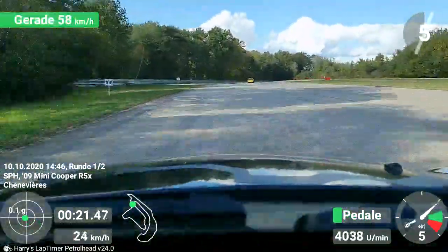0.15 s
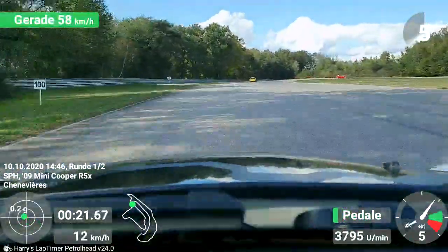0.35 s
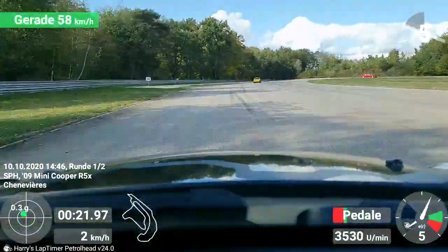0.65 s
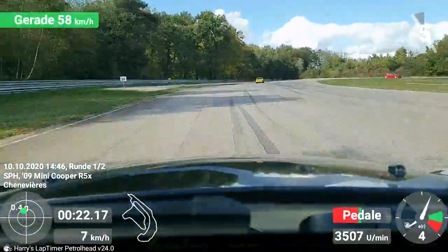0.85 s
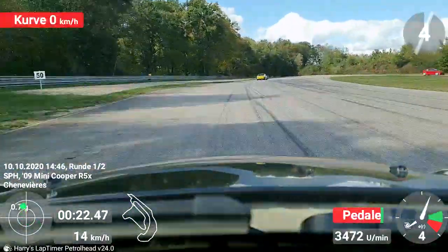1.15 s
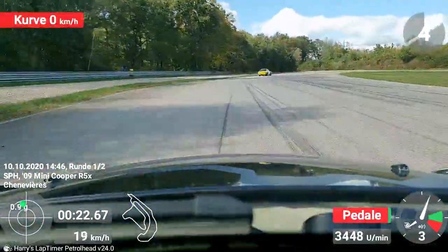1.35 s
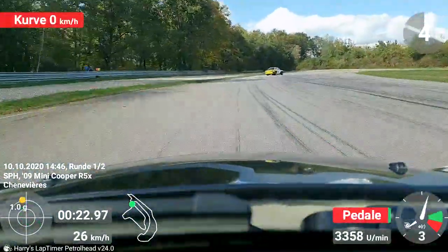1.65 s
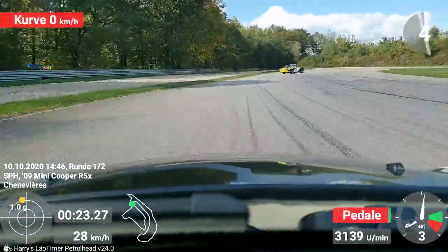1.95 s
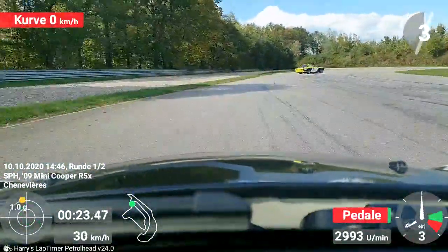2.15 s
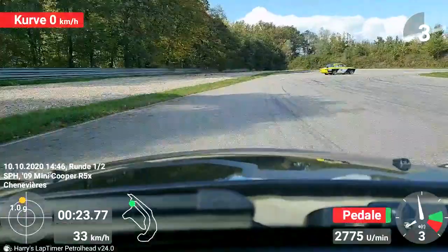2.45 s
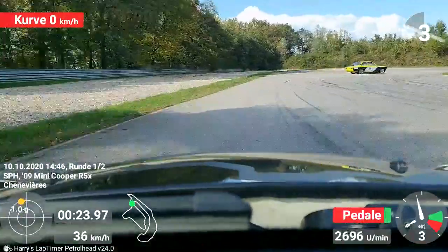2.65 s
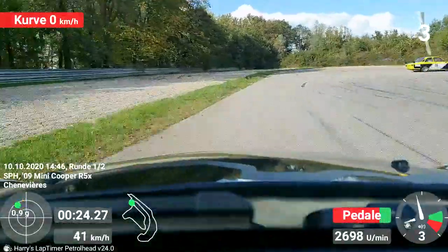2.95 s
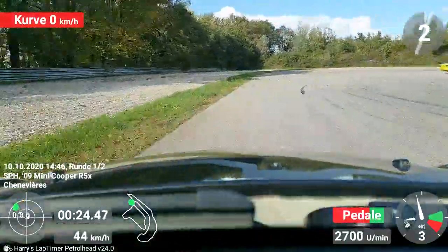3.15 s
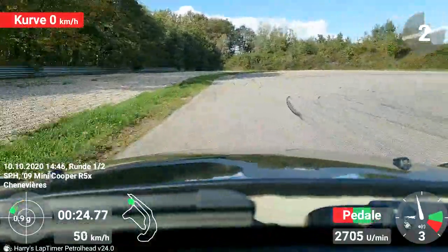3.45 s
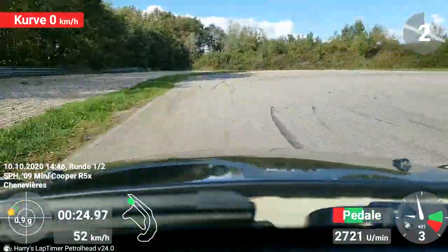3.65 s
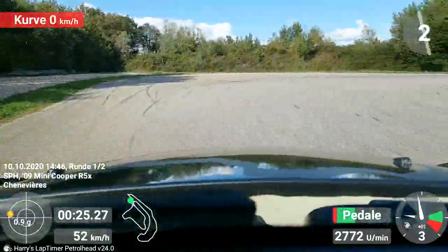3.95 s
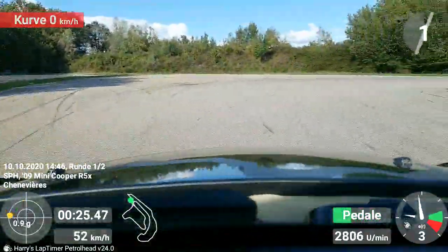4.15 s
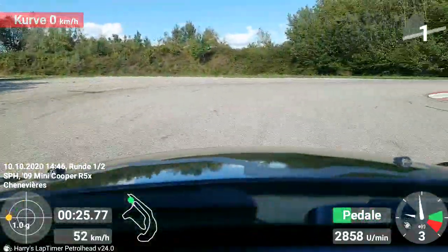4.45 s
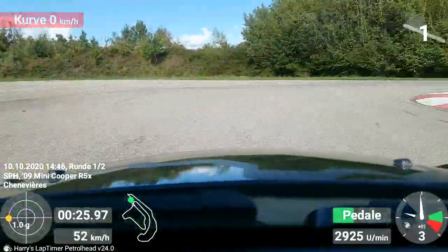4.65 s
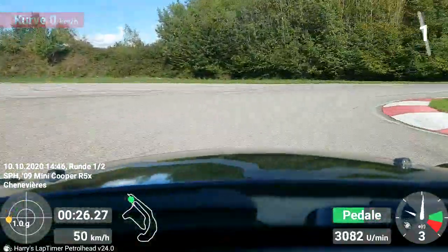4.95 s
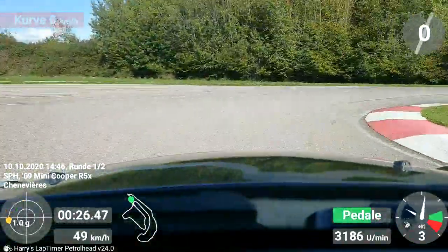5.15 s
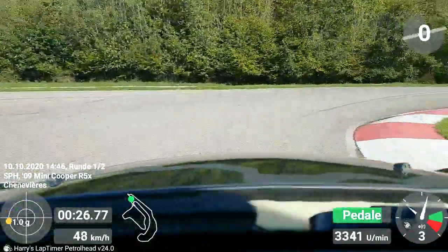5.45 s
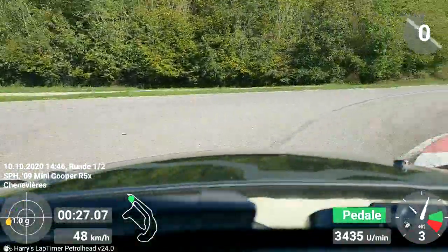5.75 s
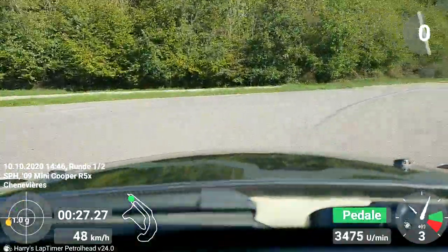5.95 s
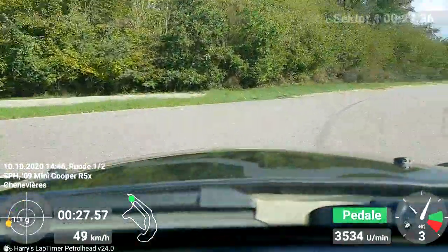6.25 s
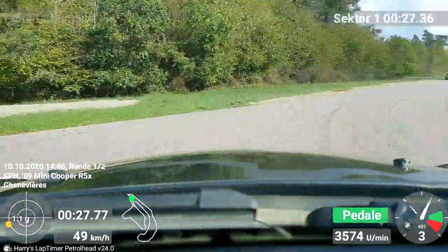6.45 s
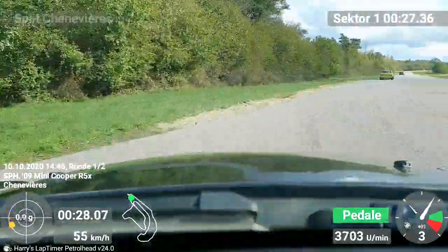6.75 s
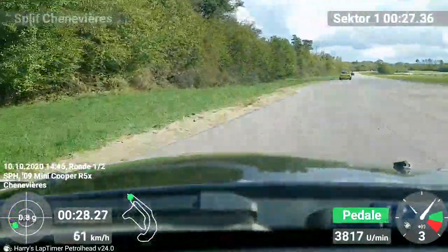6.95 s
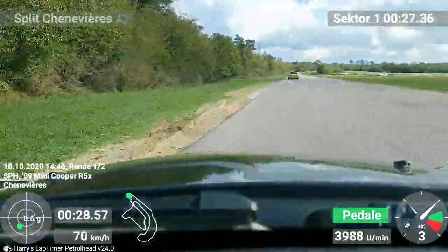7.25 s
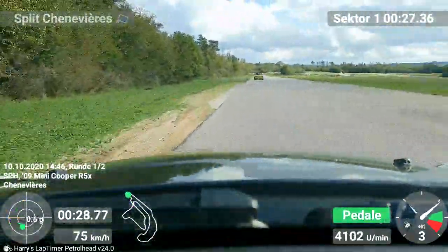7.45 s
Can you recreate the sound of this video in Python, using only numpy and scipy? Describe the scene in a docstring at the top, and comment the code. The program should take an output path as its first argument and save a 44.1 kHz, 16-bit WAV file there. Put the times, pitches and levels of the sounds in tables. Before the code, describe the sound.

Heard from behind the windscreen, a four-cylinder turbo car runs flat out over rumbling tyres and a light rush of air. It soon lifts off for a bend, with a few sharp knocks of grit, a ragged exhaust burble and faint tyre scrub. A deep engine braking drone follows as the revs sink. After a short burst of throttle the car accelerates out, the exhaust rasp returning in the cabin.

```python
"""Inside a turbocharged four-cylinder car on a race track, from a stereo pair behind the windscreen.
First it runs flat out: the exhaust booms in the cabin and rasps under boost. At 0.9 s the throttle shuts
for a bend: the pipe burbles, grit flies into the wheel arches, braked tyres scrub, and from 2 s engine
braking drones. After a stab at 4.5 s the car pulls out, and the boost returns near 7 s.
All the while the tyres rumble below and air hisses round the body."""
import sys
import numpy as np
from scipy import signal
from scipy.fft import rfft, irfft, next_fast_len
from scipy.io import wavfile
from scipy.ndimage import uniform_filter1d, minimum_filter1d, map_coordinates

SR = 44100
rng = np.random.default_rng(int(sys.argv[2]) if len(sys.argv) > 2 else 0)


def put_to_file(sound):
    """Save the sound as 16-bit audio at rate SR, in the file named by the first command-line argument."""
    columns = np.atleast_2d(sound).T  # one column per channel
    safe = np.clip(columns, -1, 1)
    whole_steps = np.round(safe * 32767)
    wavfile.write(sys.argv[1], SR, whole_steps.astype(np.int16))


N = 335160
T = np.arange(N) / SR


# engine speed: (time [s], firing rate [Hz])
FIRING_RATE = [(0.0, 157.9), (0.66, 161.6), (0.82, 156.9), (1.0, 156.3), (1.5, 134.9), (1.92, 122.6),
               (2.52, 98.4), (2.92, 125.8), (3.27, 96.3), (3.43, 88.0), (3.58, 98.1), (3.73, 85.5),
               (3.86, 92.6), (4.12, 86.1), (4.2, 92.5), (4.7, 89.3), (5.1, 87.9), (5.73, 91.9),
               (5.83, 100.1), (6.04, 91.0), (6.15, 98.2), (6.25, 95.4), (6.35, 99.2), (6.63, 98.9),
               (6.85, 111.3), (6.92, 108.5), (7.02, 117.6), (7.36, 115.9), (7.6, 124.8)]
# throttle flat out, shut, stabbed, then fed in again: (time [s], load [1 = full])
ENGINE_LOAD = [(0, 0.88), (.6, 1), (.77, 1.15), (.89, 0.03), (4.13, 0), (4.2, 0.4), (4.4, 0.42),
               (4.51, 0.91), (4.63, 0.74), (4.75, 0.1), (5.0, 0.34), (5.18, 0.08), (5.29, 0.36),
               (5.7, 0.63), (5.8, 1.06), (6.1, 0.81), (6.45, 0.86), (6.58, 0.63), (6.92, 0.79),
               (7.02, 0.96), (7.6, 0.99)]
def engine():
    """The engine from the seats: boom, rasp and burble all follow the same firings."""
    (hz,), (load,) = curves(FIRING_RATE), curves(ENGINE_LOAD)
    load = np.maximum(load, 1e-3)
    shut = np.clip(1 - load / 0.19, 0, 1)  # 1 with the throttle closed, 0 above light load
    phase = 2 * np.pi * np.cumsum(hz) / SR
    return exhaust_boom(hz, phase, load, shut) + exhaust_rasp(hz, phase, load) + burble(phase, load, shut)


# the wheels drive the engine: (time [s], burble level [dB], drone level [dB])
OVERRUN_LEVELS = [(.95, -16.5, -24.5), (1.55, -19.5, -27.5), (1.82, -20, -26), (2.0, -20.5, -15),
                  (2.4, -18, -10.5), (3.27, -18.5, -11.5), (3.5, -24.5, -11.5), (3.9, -31, -11.5),
                  (4.15, -37.5, -18)]
# balance of the exhaust overtones in the cabin: (frequency [Hz], level [dB])
OVERTONE_SPECTRUM = [(170, 6), (200, 0.5), (240, -6), (270, -8), (295, -5), (348, -10), (368, -8.5),
                     (395, -7.5), (470, -19), (640, -19)]
def exhaust_boom(hz, phase, load, shut, full_load_db=-8.5, lug_hz=92.5, drone_edge_hz=96):
    """Even firings boom all round the microphones, under load or engine braking; load adds overtones."""
    _, drone_db = curves(OVERRUN_LEVELS)
    drone = shut * amp(drone_db - 0.43 * np.maximum(drone_edge_hz - hz, 0))  # fades at low revs
    boom_db = decibels(amp(full_load_db) * load + drone)
    out = tone(phase, hz, boom_db + 0.25 * wobble(25))
    # overtones grow faster than the boom with load, and mellow as the revs rise
    pulling_db = full_load_db - 3.5 + 1.27 * decibels(load) - 0.22 * (hz - lug_hz)
    overtone_db = decibels(amp(pulling_db) + amp(-25.5) * drone)
    orders = (2, 3, 4)
    shape = [along(OVERTONE_SPECTRUM, k * hz) - 6 * (k == 4) for k in orders]  # the fourth is weak
    total_db = 10 * np.log10(np.sum(amp(shape) ** 2, axis=0))
    for k, db in zip(orders, shape):
        smear = (k - 1) * (1.4 * (k - 2) + 0.022 * (hz - lug_hz))  # the pipe smears each pulse
        out += tone(k * phase + smear, k * hz, overtone_db + db - total_db + 1.68 * wobble(30))
    return out


# the rasp as it reaches the seats: (frequency [Hz], level [dB])
RASP_SPECTRUM = [(20, -32.5), (45, -11.5), (60, -9.5), (120, 4.5), (200, 0.5), (240, -9.5), (282, 2),
                 (330, -12), (400, -1.5), (450, -8), (500, -20.5), (565, -6), (640, -20.5), (710, -24.5),
                 (800, -31.5), (950, -35.5), (1300, -48)]
def exhaust_rasp(hz, phase, load, boost_db=13, smear_hz=110, flutter_db=2.2, step=8):
    """One cylinder barks harder each cycle: lines at quarters of the firing rate, louder under boost."""
    level_db = -47.5 + 0.81 * decibels(load + 0.069) + boost_db * turbo(hz)
    t, hz, phase, level_db = [v[::step] for v in (T, hz, phase, level_db)]  # low sounds need few samples
    out = np.zeros((2, len(t)))
    for k in np.setdiff1d(np.arange(2, 33) / 4, [1, 2, 3, 4]):  # orders 1-4 belong to the boom
        accent_db = 3 * (k % .5 == 0) + 4 * (k % 1 == 0)  # halves and wholes stand out
        db = level_db + along(RASP_SPECTRUM, k * hz) + accent_db + flutter_db * wobble(18, t)
        lag = (k * hz / smear_hz) ** 2 + rng.normal(0, 1.2)  # the higher part of each bark arrives later
        out += tone(k * phase - lag + .1 * wobble(22, t), k * hz, db)
    return signal.resample_poly(out, step, 1, axis=1)[:, :N]


def turbo(hz, onset_hz=105.8, width_hz=3.5, spool_s=0.042):
    """Boost 0-1: it comes in above a certain firing rate, a little late."""
    lagged_hz = np.interp(T - spool_s, T, hz)
    return 1 / (1 + np.exp((onset_hz - lagged_hz) / width_hz))


# the ringing exhaust pipe, heard from inside the car: (frequency [Hz], level [dB])
PIPE_SPECTRUM = [(20, -47.5), (70, -7.5), (105, 0), (135, 2), (168, 5.5), (200, -5.5), (235, -10.5),
                 (290, -6), (330, -10.5), (385, -22.5), (460, -19.5), (540, -25), (700, -31), (1500, -76)]
def burble(phase, load, shut, depth=0.86):
    """Throttle shut: ragged puffs, one per firing, ring in the pipe; under load they die away."""
    overrun_db, _ = curves(OVERRUN_LEVELS)
    level = shut * amp(overrun_db) + (1 - shut) * amp(-32 - 14.5 * load)
    return level * noise(PIPE_SPECTRUM, gate=1 + depth * np.cos(phase))


# the asphalt under the floor: (time [s], tread roar [dB], drumming between bumps [dB])
ROAD_LEVELS = [(0, -24, -31.5), (.7, -31, -34), (1.4, -26.5, -30), (2.5, -29, -28.5), (4, -27.5, -28.5),
               (5.7, -26.5, -29), (6.2, -28.5, -33), (7.6, -30, -29.5)]
# bumps in the asphalt: (time [s], drumming level [dB])
ROAD_BUMPS = [(1.14, -20.5), (1.48, -29), (1.69, -29), (2.29, -24), (3.2, -24), (4.0, -26), (4.44, -22),
              (5.01, -20), (5.29, -23.5), (5.89, -21), (6.5, -25.5), (6.88, -24), (7.27, -27)]
# the drumming body shell: (frequency [Hz], level [dB])
SHELL_SPECTRUM = [(15, -34.5), (30, -14.5), (42, -0.5), (52, -7), (65, 11.5), (76, 2), (95, -16),
                  (200, -74)]
# tread roar through the floor: (frequency [Hz], level [dB])
TREAD_SPECTRUM = [(20, -34.5), (80, -6), (130, 2.5), (220, 0), (290, -1), (360, -9.5), (450, -9),
                  (560, -20), (700, -23.5), (850, -25), (1050, -35.5), (2000, -58.5), (5000, -88)]
def road(patchy_db=1.3, uneven_db=3.0, bump_s=.05):
    """Bumps drum the body shell round the microphones while the tread roars on the asphalt below."""
    roar_db, drum_db = curves(ROAD_LEVELS)
    jolts = amp(drum_db + uneven_db * wobble(8)) + sum(swell(s, db, bump_s) for s, db in ROAD_BUMPS)
    drum = noise(SHELL_SPECTRUM)
    running_rms = np.sqrt(np.abs(uniform_filter1d(drum[0] ** 2, SR // 8)) + 1e-6)
    roar = amp(roar_db + patchy_db * wobble(12)) * noise(TREAD_SPECTRUM)
    return jolts * drum / running_rms + roar


# grit in the arches: (time [s], spray [dB], panel knock [dB], tick [dB], clack pitch [Hz], clack [dB])
GRIT_HITS = [(0.962, -29, -27.5, -38.5, 1180, -24), (1.09, -44.5, -47, -41.5, 3301, -44),
             (1.146, -40.5, -48, -45, 3300, -40), (1.194, -39.5, -54, -49, 3500, -49),
             (1.279, -27, -17.5, -40.5, 2130, -36), (1.372, -46, -65, -51.5, 3600, -45),
             (2.097, -51.5, -75, -41.5, 5400, -41.5), (3.616, -49.5, -74.5, -53, 4143, -41.5),
             (5.208, -47, -70, -53, 3470, -39)]
# grains of sand that tick without ringing: (time [s], level [dB])
SAND_TICKS = [(.091, -48), (.215, -50.5), (.236, -56), (.274, -57.5), (.379, -60), (.597, -59.5),
              (1.025, -57.5), (3.916, -56), (4.403, -57.5), (5.765, -59.5)]
# modes of the wheel arch panel: (frequency [Hz], level [dB], decay T60 [s])
ARCH_MODES = [(490, 4, 0.097), (557, 4.5, 0.1), (622, -3.5, .08), (805, -7, 0.054), (866, -17, 0.086),
              (1155, -15.5, 0.13), (2235, -8, 0.07), (2828, -27, .06), (3500, -24, 0.08)]
# shattering grit: (frequency [Hz], level [dB])
SPRAY_SPECTRUM = [(150, -13.5), (500, 13), (1000, 4), (1500, 0), (3500, -3), (5500, -10), (7500, -21),
                  (16000, -24.5)]
# the fine tick of each impact: (frequency [Hz], level [dB])
TICK_SPECTRUM = [(1000, -36.5), (3500, -3.5), (6000, -3.5), (10000, 2), (16000, -5.5)]
def grit(rise_s=0.0034, hold_s=0.019, spray_t60=.09, tick_t60=.075, clack_t60=0.1, clack_width=0.14):
    """Close by, each bit cracks, shatters round the arch, knocks its panel and clacks on what it meets."""
    spray, tick, ring = np.zeros(N), np.zeros(N), np.zeros((2, N))
    t = np.arange(SR // 4) / SR
    freqs = np.fft.rfftfreq(len(t), 1 / SR)
    onset = 1 - np.exp(-t / rise_s)
    crack = .5 * np.exp(-t / 0.0026)
    snap = onset * (amp(-60 * t / tick_t60) + crack)
    after = lambda s: slice(round(s * SR), round(s * SR) + len(t))
    for s, spray_db, knock_db, tick_db, clack_hz, clack_db in GRIT_HITS:
        spray[after(s)] += onset * amp(spray_db - 60 * np.maximum(t - hold_s, 0) / spray_t60)
        tick[after(s)] += amp(tick_db) * snap
        cluster = 1 / (1 + ((freqs / clack_hz - 1) / clack_width) ** 2)  # crowded, well damped modes
        clack = unit(irfft(rfft(rng.standard_normal((2, len(t)))) * cluster, len(t)))
        ring[:, after(s)] += onset * amp(clack_db - 60 * t / clack_t60) * clack
        for hz, db, t60 in ARCH_MODES:
            mic_phase = rng.normal(0, 0.49, (2, 1))
            knock = onset * amp(knock_db + db + rng.normal(0, 1) - 60 * t / t60)
            ring[:, after(s)] += knock * np.sin(2 * np.pi * hz * t + mic_phase)
    for s, tick_db in SAND_TICKS:
        tick[after(s)] += amp(tick_db) * snap
    clatter = amp(wobble(700))
    return ring + clatter * (spray * noise(SPRAY_SPECTRUM) + tick * noise(TICK_SPECTRUM))


# tyres sliding under the brakes: (time [s], level [dB], half length [s])
BRAKE_SCRUBS = [(1.068, -50.5, 0.0097), (1.186, -48.5, 0.069), (1.72, -46, .05), (1.928, -46, 0.028),
                (2.129, -46, 0.042), (2.546, -41.5, .06), (2.709, -45, 0.027)]
def tyre_scrub(grain_db=2):
    """Braked tyres slide in short, grainy swells, faint from the seats."""
    swells = sum(swell(s, db, half_s) for s, db, half_s in BRAKE_SCRUBS)
    spectrum = [(300, -8.5), (700, 7), (1400, -1.5), (2500, -11.5), (4000, -19), (8000, -38), (16000, -41)]
    return swells * amp(grain_db * wobble(150)) * noise(spectrum)


# airflow just beyond the glass: (time [s], rush level [dB], hiss level [dB])
AIR_LEVELS = [(0, -49.5, -66.5), (1.15, -50.5, -63), (1.55, -53.5, -70.5), (2.3, -50.5, -64.5),
              (3.6, -51, -58.5), (5.8, -51.5, -58), (5.97, -53.5, -64.5), (6.6, -54.5, -61.5),
              (7.05, -53, -64)]
# the broad rush: (frequency [Hz], level [dB])
RUSH_SPECTRUM = [(300, -28.5), (800, -1), (1050, 0), (1330, 3.5), (1600, -4.5), (2400, -7), (3500, -10),
                 (4200, -13), (5200, -17.5), (6600, -23), (7400, -29), (10000, -32), (13500, -33),
                 (16000, -38)]
# the fine hiss: (frequency [Hz], level [dB])
HISS_SPECTRUM = [(800, -40), (1800, -0.5), (3500, 4), (5000, -2), (6600, -1.5), (7500, -12), (8400, -8.5),
                 (12000, -12.5), (16000, -23)]
def air(gust_db=0.25, grain_db=1.0):
    """Air rushes round the body; a finer, grainy hiss grows through the bend."""
    rush_db, hiss_db = curves(AIR_LEVELS)
    rush = amp(rush_db + gust_db * wobble(6.5)) * noise(RUSH_SPECTRUM)
    hiss = amp(hiss_db + grain_db * wobble(200)) * noise(HISS_SPECTRUM)
    return rush + hiss


# standing waves across the pair: (frequency [Hz], side minus mid [dB])
STANDING_WIDTH = [(100, -34.5), (200, -24), (300, -19), (400, -15), (500, -2), (600, -3), (800, -1)]
# their phase across the pair: (frequency [Hz], side lead from quadrature [rad])
STANDING_PHASE = [(200, 0.086), (280, 1.4), (420, 1.5), (540, 0.092)]
def tone(phase, hz, db):
    """One engine order; cabin standing waves make its level and phase differ between the microphones."""
    mid = -np.cos(phase)
    side = np.sin(phase + along(STANDING_PHASE, hz)) * amp(along(STANDING_WIDTH, hz))
    return np.sqrt(2) * amp(db) * np.array([mid - side, mid + side])


# cabin resonances and a notch: (frequency [Hz], width [Hz], gain [dB])
CABIN_MODES = [(1770, 81, 3), (2180, 120, 3.5), (2650, 120, 4), (3400, 220, 4), (5330, 230, -2),
               (5670, 200, 3.5), (6700, 390, 3), (8500, 180, 3.5)]
# spread of noise across the pair: (frequency [Hz], side minus mid [dB])
NOISE_WIDTH = [(30, -14), (65, -17), (130, -15.5), (230, -10.5), (330, -11), (450, -5), (550, -1.5),
               (720, -0.5), (930, 3), (1300, -0.5), (1620, 3), (2150, -2), (4200, 1), (15000, 0)]
def noise(spectrum, gate=1):
    """Noise heard through the cabin: bass alike at both microphones, treble diffuse; mid rms 1."""
    def colour(hz):
        cavity_db = sum(db / (1 + ((hz - centre) / (width / 2)) ** 2) for centre, width, db in CABIN_MODES)
        return amp(along(spectrum, hz) + cavity_db + np.outer([0, 1], along(NOISE_WIDTH, hz)))
    mid, side = filtered(gate * rng.standard_normal((2, N)), colour)
    return np.array([mid + side, mid - side]) / np.std(mid)


def amp(db):
    """Decibels to gain."""
    return 10 ** (np.asarray(db) / 20)


def decibels(gain):
    """Gain to decibels."""
    return 20 * np.log10(gain)


def unit(x):
    """Scale to rms 1."""
    return x / np.sqrt(np.mean(x ** 2) + 1e-20)


def along(points, hz):
    """(Hz, value) points read on a log axis."""
    f, v = np.transpose(points)
    return np.interp(np.log(hz + 1), np.log(f + 1), v)


def curves(rows):
    """One value per sample for each column after the time."""
    s, *cols = np.transpose(rows)
    return [np.interp(T, s, c) for c in cols]


def swell(s, db, half_s):
    """A bell-shaped envelope peaking at time s."""
    return amp(db) * np.exp(-((T - s) / half_s) ** 2 / 2)


def wobble(rate, at=T):
    """A smooth random curve, rate knots a second."""
    coarse = T[::64]
    knots = rng.standard_normal(int(T[-1] * rate) + 4)
    return np.interp(at, coarse, map_coordinates(knots, [coarse * rate]))


def filtered(x, response):
    """x times a response of frequency."""
    m = next_fast_len(N + SR // 4, True)
    return irfft(rfft(x, m) * response(np.fft.rfftfreq(m, 1 / SR)), m)[..., :N]


# balance of the two microphones: (frequency [Hz], left minus right [dB])
MIC_BALANCE = [(250, 0), (500, -.8), (1200, -.5), (2000, -.8), (3300, 1.8), (5500, 2.3), (9000, -1.5),
               (15000, -.8)]
def scene():
    """Engine, road and air at the pair behind the windscreen."""
    cabin = engine() + road() + tyre_scrub() + air() + grit()
    return filtered(cabin, lambda hz: amp(np.outer([.5, -.5], along(MIC_BALANCE, hz))))


def record(dry, ceiling=1.0, top_hz=15800):
    """A limiter holds the peaks down; nothing is kept above the band limit."""
    needed_gain = np.minimum(1, ceiling / (np.abs(dry).max(axis=0) + 1e-9))
    gain = uniform_filter1d(minimum_filter1d(needed_gain, size=2001), size=2001)
    return filtered(dry * gain, lambda hz: hz < top_hz)


dry = scene()
out = record(dry)
put_to_file(out)
```